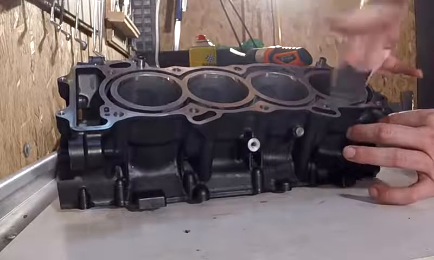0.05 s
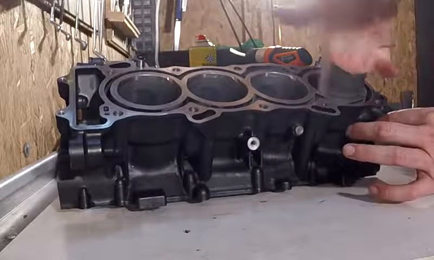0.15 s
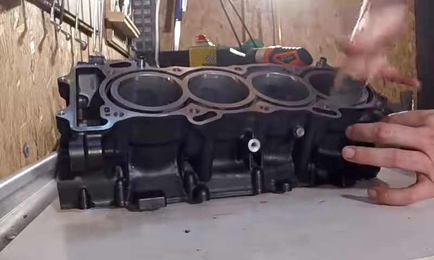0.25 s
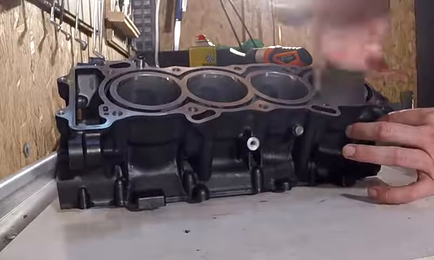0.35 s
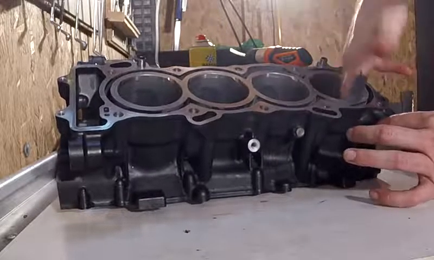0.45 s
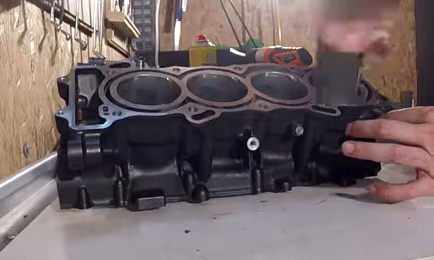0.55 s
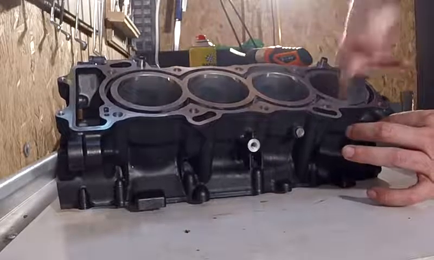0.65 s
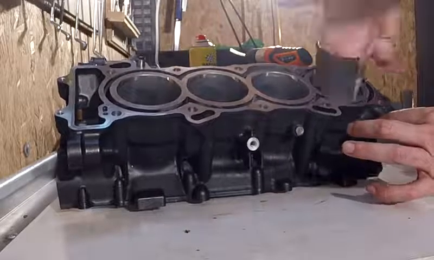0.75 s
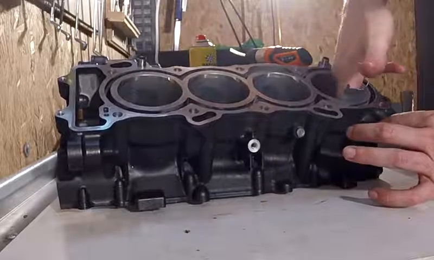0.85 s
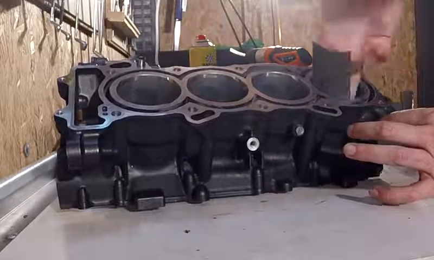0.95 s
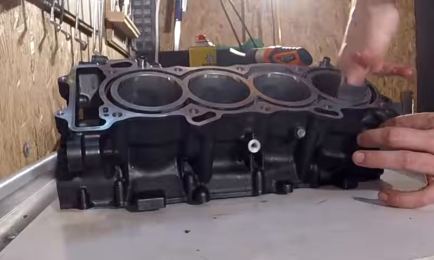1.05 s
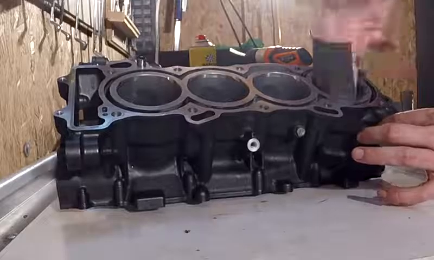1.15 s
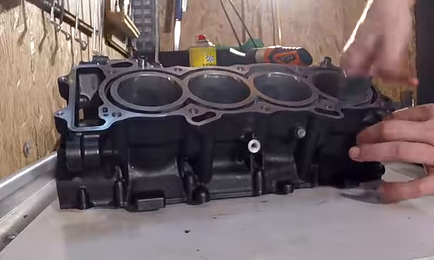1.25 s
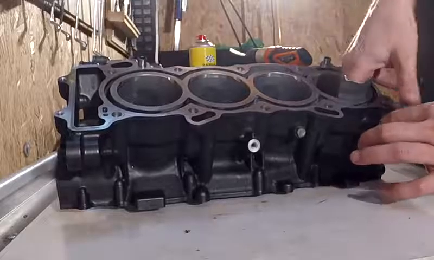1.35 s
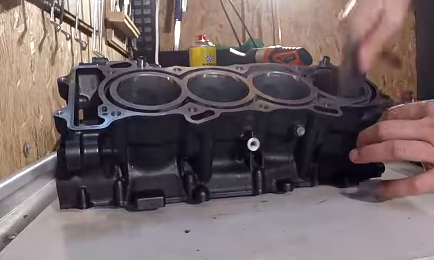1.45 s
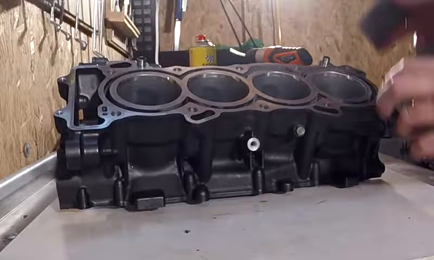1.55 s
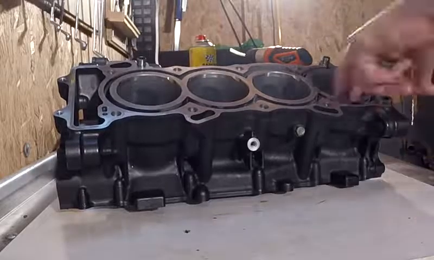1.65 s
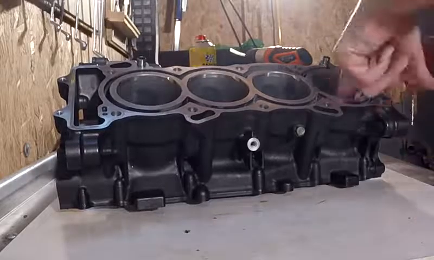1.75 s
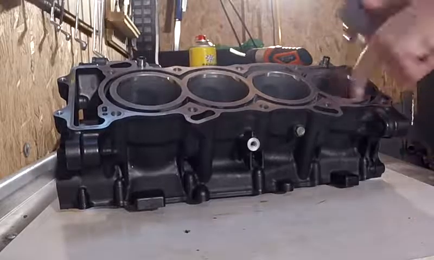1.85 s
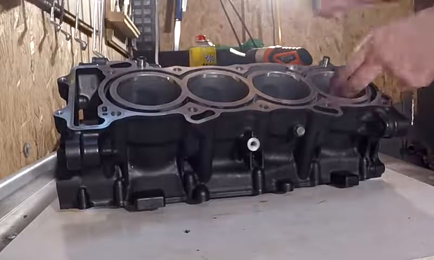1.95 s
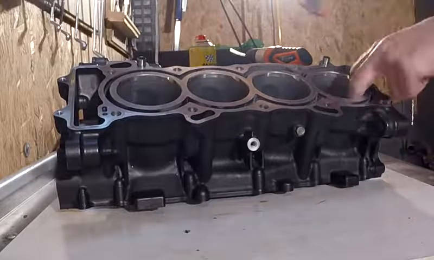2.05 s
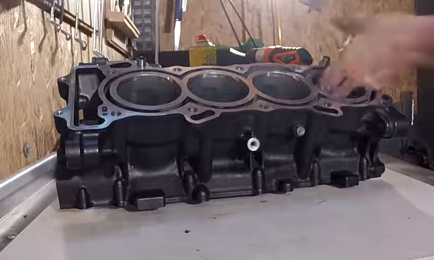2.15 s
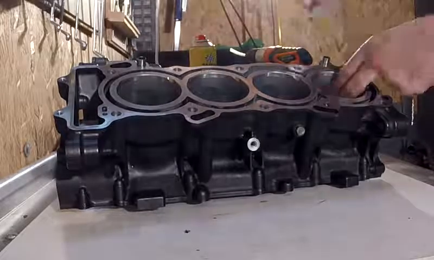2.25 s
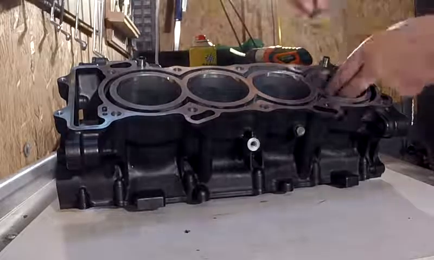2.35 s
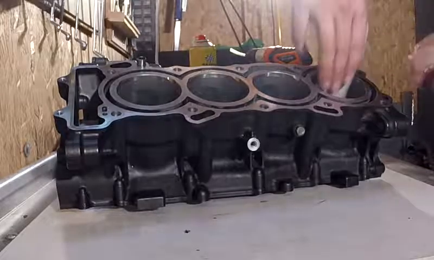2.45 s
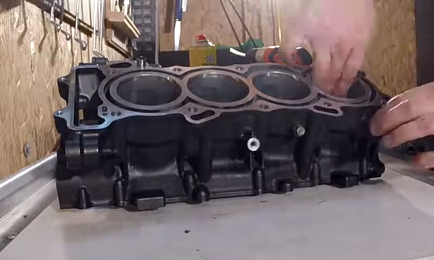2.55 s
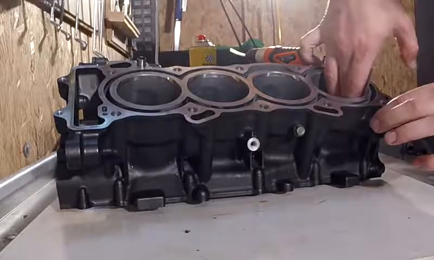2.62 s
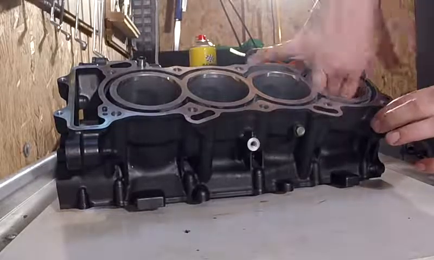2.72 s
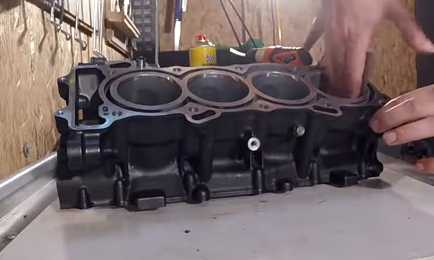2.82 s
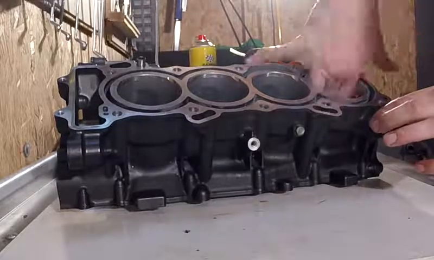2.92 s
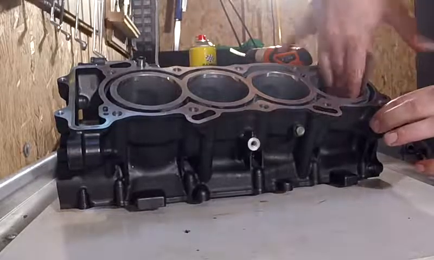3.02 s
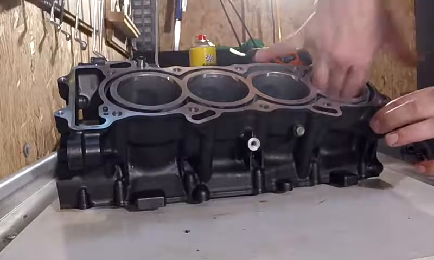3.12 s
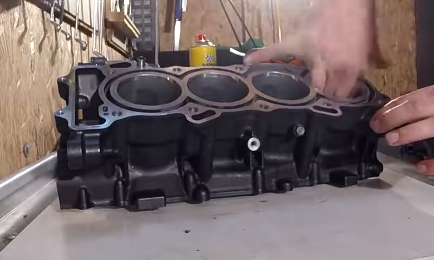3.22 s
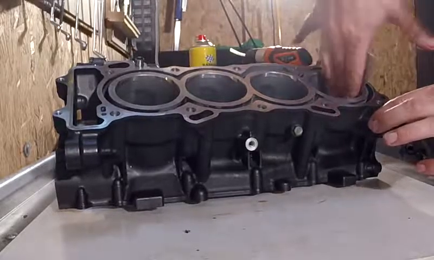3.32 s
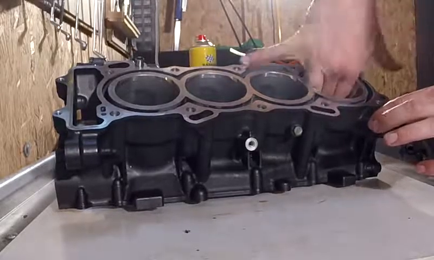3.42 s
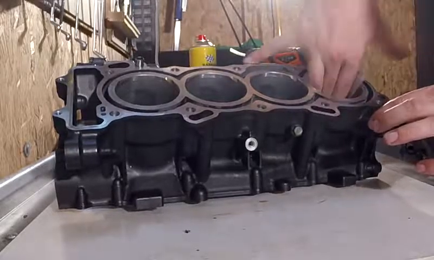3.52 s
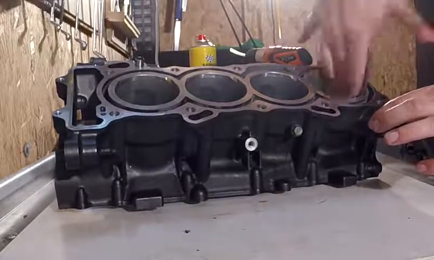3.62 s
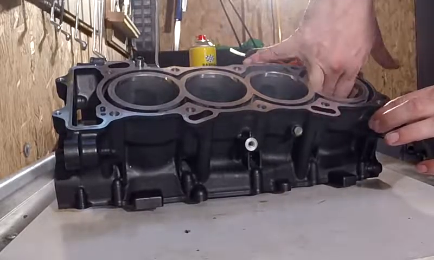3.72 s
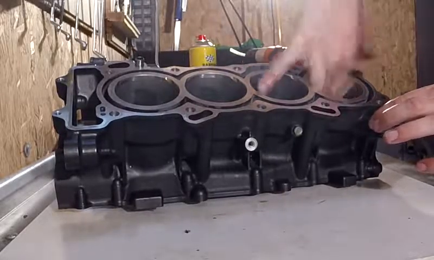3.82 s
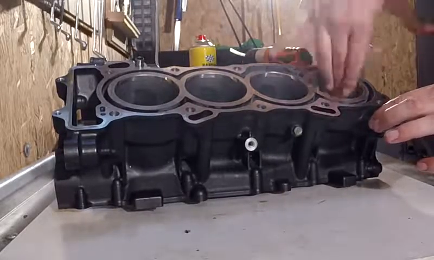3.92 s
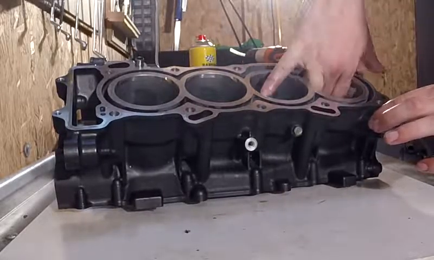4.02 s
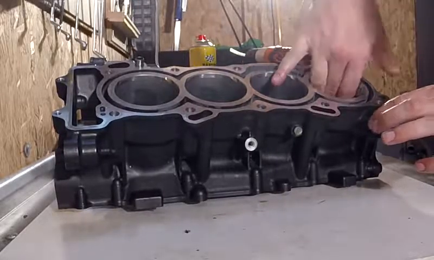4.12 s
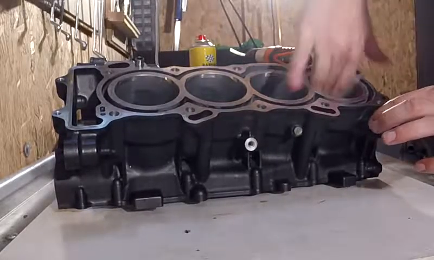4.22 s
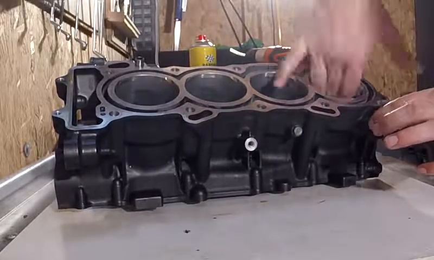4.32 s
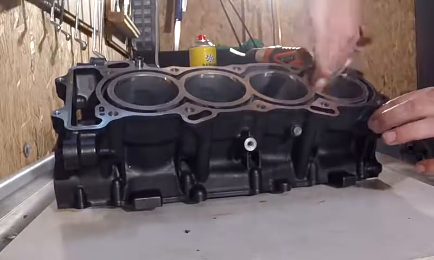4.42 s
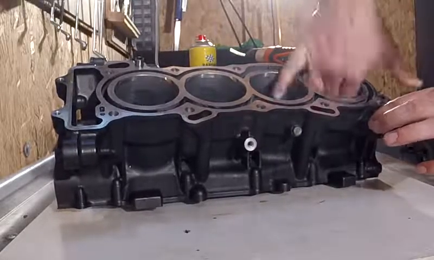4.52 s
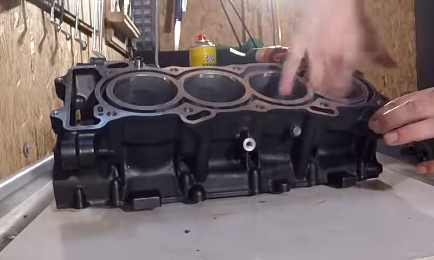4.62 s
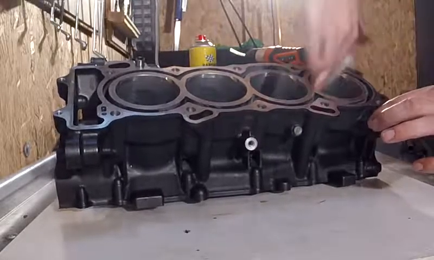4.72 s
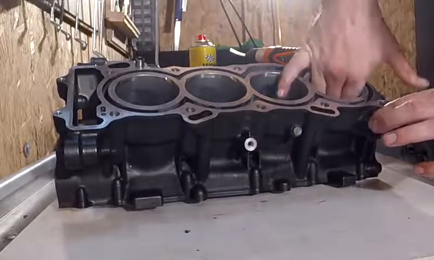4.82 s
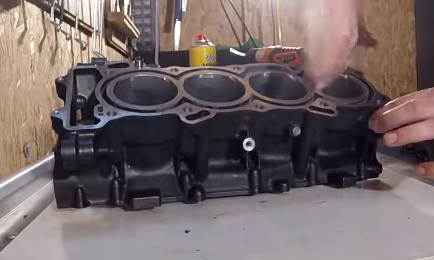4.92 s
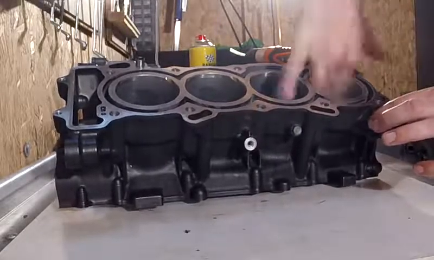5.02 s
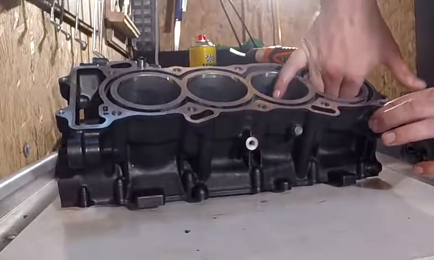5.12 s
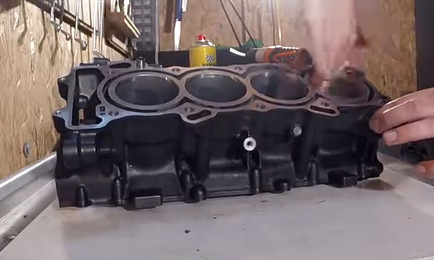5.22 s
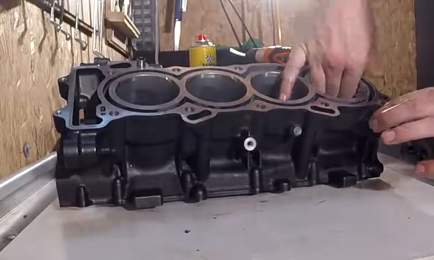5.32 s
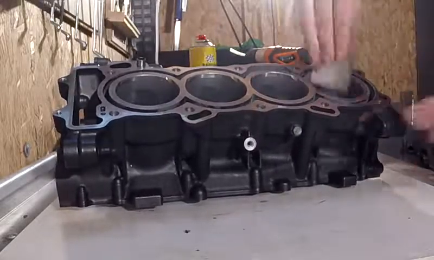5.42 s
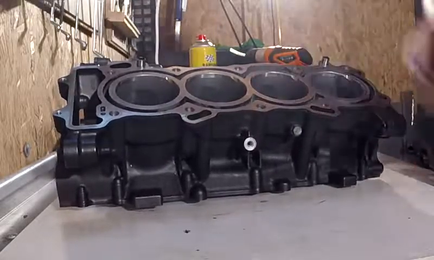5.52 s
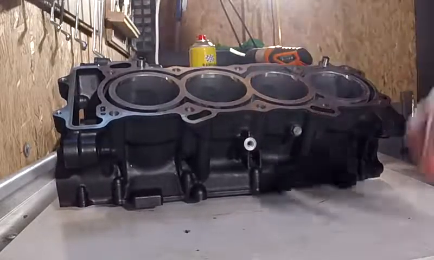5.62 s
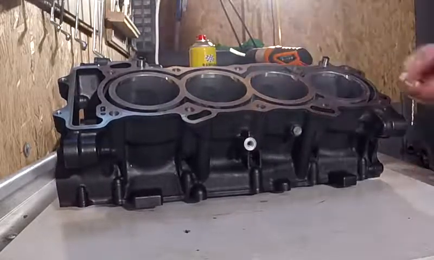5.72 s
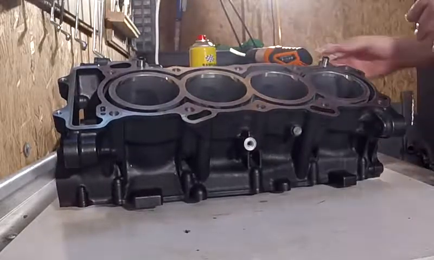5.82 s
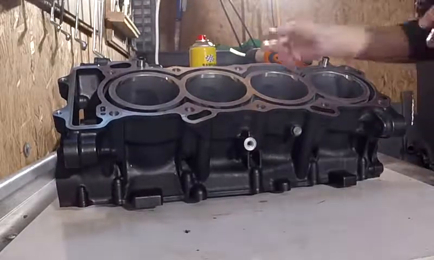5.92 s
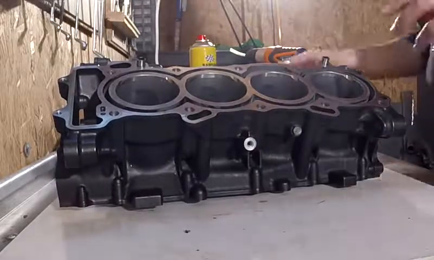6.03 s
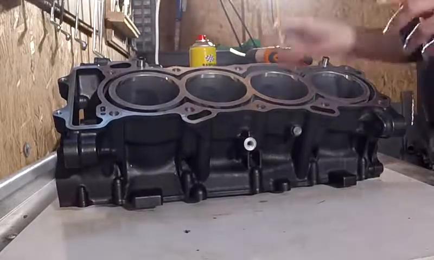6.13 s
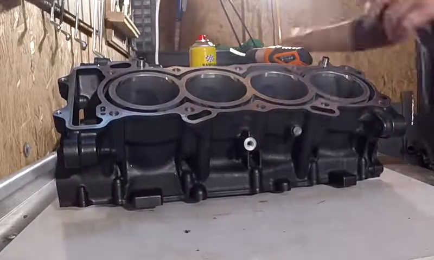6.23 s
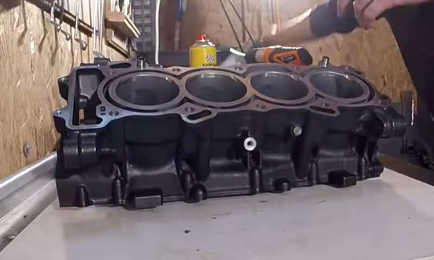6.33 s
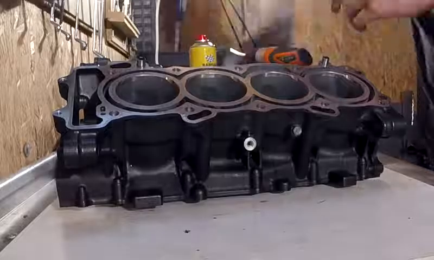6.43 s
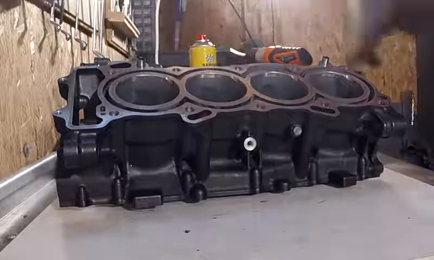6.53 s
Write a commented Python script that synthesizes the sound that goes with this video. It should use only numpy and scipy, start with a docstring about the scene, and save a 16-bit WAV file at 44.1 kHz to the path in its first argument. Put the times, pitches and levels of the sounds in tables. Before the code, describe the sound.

Abrasive paper hisses in fast short strokes against metal, with dull clunks of a heavy casting, a break, coarse rasps and renewed rubbing.

```python
"""Abrasive paper is worked by hand up and down the bore of an engine block on a bench, while the workshop rumbles faintly.
First come quick strokes: pushes break loose at once and hiss briefly, and between them the paper drags back softly.
From early on the block rocks and knocks on the bench; after a pause come rasps, a snap of the paper and more strokes.
A last snap ends the rubbing and a faint knock follows. Tiny random clicks of grit are coloured by sheet, bore and metal;
knocks are short contacts that ring the block; shaking, creeping paper and workshop are filtered noise."""
import sys
import numpy as np
from scipy import signal
from scipy.fft import rfft, irfft
from scipy.io import wavfile
from scipy.ndimage import uniform_filter1d

SR = 44100
rng = np.random.default_rng(int(sys.argv[2]) if len(sys.argv) > 2 else 0)


def inscribe(sig):
    """Save sig as 16-bit PCM at rate SR to the path in sys.argv[1].

    A 1-D sig is mono; a 2-D sig holds one channel per row.
    Samples are clipped to [-1, 1] before scaling.
    """
    pcm = np.round(np.clip(np.atleast_2d(sig).T, -1, 1) * 32767)
    wavfile.write(sys.argv[1], SR, pcm.astype(np.int16))


N = 289737

ROCK_HZ = 65.3  # how fast the block rocks on the bench

# Fixed resonances of the metal casting: (centre [Hz], width [Hz], boost [dB])
CASTING_RESONANCES = [(663, 45, 7), (880, 50, 3), (1017, 55, 5), (1335, 120, 4), (1800, 250, -3),
                      (2316, 70, 4), (2590, 90, 3), (2906, 80, 4), (3345, 90, 3), (4020, 220, 2),
                      (4957, 90, 3), (7690, 100, 3), (8062, 100, 4), (8349, 120, 5)]


def undb(db):
    """Turn decibels into a gain."""
    return 10 ** (np.asarray(db) / 20)


def unit(x):
    """Scale a sound to an rms (average strength) of 1."""
    return x / np.sqrt(np.mean(x ** 2))


def freqs(size):
    """Frequency in Hz of every spectral bin, at least 1 so that its logarithm exists."""
    return np.maximum(np.fft.rfftfreq(size, 1 / SR), 1)


def contour(f, points):
    """Read a curve of (Hz, dB) points on a log-frequency axis."""
    hz, db = np.transpose(points)
    return np.interp(np.log(f), np.log(hz), db)


def bump(f, hz, width_hz):
    """Outline of one resonance, 1 at its centre."""
    return 1 / (1 + (2 * (f - hz) / width_hz) ** 2)


def colour(x, db):
    """Filter with the given gain in each bin; minimum phase makes rings follow their cause."""
    half = len(x) // 2
    cepstrum = irfft(np.log(undb(db)), len(x))
    # fold the second half onto the first, so the filter never rings ahead of time
    cepstrum[1:half] *= 2
    cepstrum[half + 1:] = 0
    response = np.exp(rfft(cepstrum))
    return irfft(rfft(x) * response, len(x))


def walk(size, rate):
    """Smooth chance with a spread near 1, heading for a new random value rate times a second."""
    knots = rng.standard_normal(2048)
    position = np.arange(size) / SR * rate
    return 1.2 * np.interp(position, np.arange(len(knots)), knots)


def add(out, start, x):
    """Mix a sound in at its time in seconds."""
    i = max(int(start * SR), 0)
    out[i:i + len(x)] += x[:max(len(out) - i, 0)]


def workshop(level_db=-53.5, waver_db=2):
    """The workshop: faint noise with a steady hiss and a low rumble that wavers."""
    # Spectrum of the workshop noise, before scaling: (frequency [Hz], relative level [dB])
    shop_spectrum = [(12, -26), (20, -1), (77, -5), (152, -9), (189, -14), (242, -12.5), (278, -13.5),
                     (443, -17), (494, -17.5), (632, -19), (787, -20.5), (1060, -21), (7450, -36.5),
                     (14000, -51.5)]
    noise = rng.standard_normal(N)
    air = undb(level_db) * unit(colour(noise, contour(freqs(N), shop_spectrum)))
    low_pass = signal.butter(2, 150, fs=SR, output="sos")
    rumble = signal.sosfiltfilt(low_pass, air)
    rumble_gain = undb(waver_db * walk(N, 9.1) - 1.5)
    return air + rumble * (rumble_gain - 1)


def room(x, wet_db=-19, t60_s=0.093, size=16384):
    """Close wooden walls add a short, faint tail in which the highest treble is weak."""
    t = np.arange(size) / SR
    wall_db = contour(freqs(size), [(60, 7.5), (500, 9.0), (4000, 15.5), (13000, -5.5)])
    tail = colour(rng.standard_normal(size), wall_db)
    # the tail starts after 2.2 ms and has faded in after 4.4 ms
    tail *= undb(-60 * t / t60_s) * np.clip(t / 0.0022 - 1, 0, 1)
    tail /= np.sqrt(np.sum(tail ** 2))
    return x + undb(wet_db) * signal.fftconvolve(x, tail)[:N]


def shake(rubbing, full_db=-44):
    """Friction tugs at the block, so the bench grumbles while the paper moves."""
    # The working arm shakes the bench: (time [s], level at full stroke [dB])
    arm_levels = [(0, -39), (0.7, -49.5), (1.35, -43), (1.55, -40.5), (2.6, -54), (3.5, -53.5), (4.3, -58),
                  (4.9, -57), (5.5, -63)]
    stroke = uniform_filter1d(np.abs(rubbing), size=1300)  # averaged over 29 ms
    tug = np.minimum(stroke / undb(full_db), 1)
    f = freqs(N)
    db = contour(f, [(20, 1.5), (60, 2.5), (130, -3.5), (250, -10.0), (600, -34), (2000, -47)])
    db += 6 * bump(f, ROCK_HZ, 31)
    grumble = unit(colour(rng.standard_normal(N), db))
    level_db = np.interp(np.arange(N) / SR, *np.transpose(arm_levels))
    return grumble * tug * undb(level_db)


def creep(rubbing, below_db=-24):
    """Around the strokes and at the turns of the hand, creeping paper whispers on the wall."""
    busy = uniform_filter1d(np.abs(rubbing), size=7000)  # averaged over 159 ms to bridge short gaps
    db = contour(freqs(N), [(200, -2), (900, 1), (3200, 7), (6000, 12), (13000, -64)])
    whisper = unit(colour(rng.standard_normal(N), db))
    return whisper * busy * undb(below_db)


def grains(size, per_s, spread):
    """Random clicks as abrasive grains catch and let go; a few are larger than the rest."""
    caught = rng.random(size) < per_s / SR
    strength_db = spread * np.minimum(rng.exponential(size=size), 5)
    return unit(caught * rng.standard_normal(size) * undb(strength_db))


def knock(contact_ms, rock_db, rattle_db=-18, rattle_t60_s=0.24, rattle_per_rock=0.67, settle_s=0.03, size=16384):
    """A foot of the block meets the bench: a short push rings the block and sets its mass rocking."""
    # What block and bench ring with: (frequency [Hz], level before metal_db [dB], time to fall 60 dB [s])
    block_modes = [(124, -13.5, 0.093), (170.6, 1, 0.024), (265, -9, 0.033), (321, -20.5, 0.031),
                   (475, -17.5, 0.039), (572, -20, 0.027), (661, -14.5, 0.058), (763, -11, 0.0093),
                   (1054, -2.5, 0.014), (1297, -6, 0.028), (1520, -54, 0.022), (1900, -26, .05)]
    metal_db = 2  # lifts the ringing above 300 Hz and the rattle out of the thud
    rocking_db, rocking_t60_s = -5, 0.19
    t = np.arange(size) / SR
    held = 1 / (1 + (t / settle_s) ** 6)  # the steadying hand stops the rocking after a few swings
    rocking_gain = undb(rocking_db + rock_db - 60 * t / rocking_t60_s)
    ring = -rocking_gain * np.sin(2 * np.pi * ROCK_HZ * t) * held
    for hz, mode_db, t60_s in block_modes:
        mode_gain = undb(mode_db + metal_db * (hz > 300) - 60 * t / t60_s)
        varied_hz = hz * (1 + 0.012 * rng.standard_normal())
        ring += mode_gain * np.cos(2 * np.pi * varied_hz * t)
    # the harder the block rocks, the more its feet chatter on the bench
    feet_db = contour(freqs(size), [(80, -10), (330, 4.5), (900, 0.5), (2500, -18), (9000, -27)])
    rattle = unit(colour(grains(size, 900, 0.49), feet_db))
    chatter_db = rattle_db + metal_db + rattle_per_rock * rock_db
    ring += rattle * held * undb(chatter_db - 60 * t / rattle_t60_s)
    # the push is half a sine wave: longer contact gives a duller knock
    contact = np.sin(np.pi * np.clip(t[:512] * 1000 / max(contact_ms, .2), 0, 1))
    return signal.fftconvolve(ring, contact / contact.sum())


def knocks(rebound_db=-8, rebound_per_rock=1.0, rebound_s=.0155, softer=1.95):
    """The block knocks, then lands again about one swing later, more softly; less rocking can make that fainter."""
    # Knocks of the block on the bench: (time [s], level [dB], contact time [ms], rocking [dB])
    knock_list = [(0.279, -17.5, 1.3, -30), (0.373, -27.5, 1.3, 2), (0.463, -27, 2.64, -2),
                  (0.6495, -12.5, 1.22, -1), (0.822, -25.5, 1.05, 8), (1.039, -17.5, 1.37, -7),
                  (1.111, -17.5, 0.53, 6), (1.361, -22, 0.87, 10), (1.391, -27, 1, -25),
                  (2.437, -38.5, 5.7, 5), (3.308, -18.5, 1.57, -14), (3.747, -34.5, 3.4, -3),
                  (3.999, -35.5, 1.2, -14), (4.481, -26.5, 0.66, 9.5), (4.52, -27, 2.8, -0.5),
                  (4.814, -34.5, 1.44, 4), (4.982, -31, 1.15, 3), (6.505, -42, 0.8, -15)]
    out = np.zeros(N)
    for start, db, contact_ms, rock_db in knock_list:
        add(out, start, undb(db) * knock(contact_ms, rock_db))
        landing = knock(softer * contact_ms, rock_db=-27)
        swing_s = rebound_s * (1 + 0.062 * rng.standard_normal())
        landing_db = db + rebound_db + rebound_per_rock * min(rock_db, 0)
        add(out, start + swing_s, undb(landing_db) * landing)
    return out


def casting_boost(f):
    """Resonances of the metal casting strengthen or weaken some frequencies, in dB."""
    return sum(boost * bump(f, hz, width) for hz, width, boost in CASTING_RESONANCES)


def ripple(f):
    """Random uneven colouring of the hiss, in dB for every frequency, weaker below 4500 Hz."""
    uneven = np.interp(f, np.linspace(0, SR / 2, 110), rng.standard_normal(110))
    return 4.2 * uneven * np.minimum(f / 4500, 1)


def cover(s):
    """The hand closes the bore more or less tightly, which sets its resonance in dB at this moment."""
    # How tightly the hand closes the bore: (time [s], strength of the resonance [dB])
    hand_cover = [(0, 13.5), (.6, 10), (1.2, 7), (1.35, -0.5), (2.65, 7), (2.85, 12.5), (3.2, 8),
                  (3.45, -2), (3.6, 12), (4.05, 3), (4.5, 7), (5.35, 6.5), (5.55, 5)]
    return np.interp(s, *np.transpose(hand_cover))


def slide(treble_db, bore_hz, bore_db, sheet_db, chatter_db, bore_width_hz=380, size=8192):
    """Sliding grit, uneven with the grip, heard through paper sheet, covered bore and casting."""
    # Spectrum of grit on metal, before the other colourings: (frequency [Hz], relative level [dB])
    grit_spectrum = [(40, -8), (120, 0), (300, -9), (600, -5.5), (1200, -5), (1900, -2), (3000, -1),
                     (4800, 0.5), (6500, -0.5), (9000, -4), (13000, -6), (15000, -19.5)]
    f = freqs(size)
    db = contour(f, grit_spectrum) + casting_boost(f)
    db += treble_db * np.interp(f, [2600, 8500], [0, 1])
    # the hollow under the hand rings, with a dip on either side
    hollow = bump(f, bore_hz, bore_width_hz)
    hollow -= 0.26 * bump(f, 0.61 * bore_hz, 390)
    hollow -= 0.36 * bump(f, 1.34 * bore_hz, 340)
    db += bore_db * hollow
    db += sheet_db * bump(f, 4870, 2900)
    grit = grains(size, 40000, 0.16) * undb(chatter_db * walk(size, 287.0))
    # the hiss fades back and forth between two random colourings, so its fine tone keeps changing
    fade = 2 * np.pi * 4 * np.arange(size) / SR
    first = unit(colour(grit, db + ripple(f)))
    second = unit(colour(grit, db + ripple(f)))
    return unit(first * np.cos(fade) ** 2 + second * np.sin(fade) ** 2)


def flick(t60_s=0.051, rise_s=0.0017):
    """The stiff sheet's edge snaps dryly: a burst of grit sound that dies away fast."""
    # Snaps as the paper is set in and as it is lifted away: (time [s], level [dB])
    flick_list = [(2.594, -35), (5.716, -39)]
    out = np.zeros(N)
    for start, db in flick_list:
        snap = slide(treble_db=-6.5, bore_hz=2600, bore_db=6, sheet_db=8.5, chatter_db=-1.0)
        t = np.arange(len(snap)) / SR
        add(out, start, snap * np.minimum(t / rise_s, 1) * undb(db - 60 * t / t60_s))
    return out


def rasps(width_hz=750, body_db=18, depth_db=15, level_db=1, size=8192):
    """Fingers and paper judder on the wall: coarse stick-slip builds and dies away, ringing the bore."""
    # Rasps: (start [s], build-up [s], dying away [s], level before level_db [dB], centre [Hz])
    rasp_list = [(2.065, 0.026, .025, -52.5, 1980), (2.075, .038, 0.029, -49, 840),
                 (4.291, 0.013, 0.035, -43, 1150), (4.592, 0.043, 0.0053, -39.5, 1400),
                 (4.68, 0.0076, 0.018, -43, 980), (4.763, 0.0066, 0.11, -41.5, 1390),
                 (4.934, 0.017, 0.017, -40, 1000), (5.131, 0.014, 0.011, -42.5, 1350),
                 (5.231, 0.0086, .03, -34.5, 900), (5.239, 0.015, 0.074, -39.5, 1570)]
    out, f = np.zeros(N), freqs(size)
    t = np.arange(size) / SR
    skirt_db = contour(f, [(100, 2), (450, -12.5), (700, 3.5), (1150, 0.0), (1800, 9),
                           (4200, 9.5), (6500, 0), (14000, -8)])
    for start, build_s, die_s, db, hz in rasp_list:
        body = body_db * bump(f, hz, width_hz)
        judder = unit(colour(grains(size, 3500, 0.67), skirt_db + casting_boost(f) + body))
        grip = np.interp(t, [0, build_s, build_s + die_s], [0, 1, 0])
        gain = undb(db + level_db + depth_db * (grip - 1))
        add(out, start, judder * np.minimum(6 * grip, 1) * gain)
    return out


def drags(swell_s=.024, fade_s=0.0079, level_db=0.26, slack_db_per_s=-95, slackest_db=-5.5, dull_db=-4,
          grip_db=2.16, size=16384):
    """The return stroke swells in gently, grows louder and brighter as the grip tightens, then eases off."""
    # Drags: (start [s], length [s], level before grip and level_db [dB], treble of the firm grip [dB],
    # resonance of the covered bore [Hz])
    drag_list = [(0.004, .03, -45, -2, 2150), (.2, .04, -47, -3, 2050), (.243, .05, -41, 1, 2200),
                 (.29, .043, -45, -2, 2620), (.588, .045, -46, -7, 2050), (.635, .045, -40.5, -1.5, 2460),
                 (.678, .038, -55, -18, 2880), (1.142, .094, -41, 0, 2400), (1.29, .024, -44, -11, 2900),
                 (1.333, .062, -38, -2.5, 2630), (1.545, .052, -51, 2, 3130), (2.605, .158, -46, 1.5, 3300),
                 (2.808, .044, -43, -1, 2200), (2.93, .034, -46, -9, 3370), (3.055, .058, -40, 1, 3050),
                 (3.11, .036, -45, -1, 3230), (3.19, .04, -50, -3, 3250), (3.275, .03, -53, -8, 3200),
                 (3.568, .096, -39, 3.5, 3350), (3.868, .09, -38.5, 6, 3350), (4.072, .057, -41, 1, 2850),
                 (4.215, .1, -45.5, -3, 3300), (4.32, .065, -39, 5, 2950), (4.565, .079, -39, 1.5, 3870),
                 (4.722, .082, -44, 0, 2850), (4.85, .035, -50, -5, 3060), (4.94, .03, -47, -8, 3240),
                 (5.14, .19, -38.5, 1, 3400), (5.493, .085, -47, -3, 3640)]
    sheet_db = 3.5  # how much the sheet rings
    grip_peak = 0.74  # share of a drag after which the grip is hardest
    out = np.zeros(N)
    for start, length, db, treble_db, bore_hz in drag_list:
        bore_db = cover(start)
        firm = slide(treble_db, bore_hz, bore_db, sheet_db, chatter_db=-1.2, size=size)
        loose = slide(treble_db + dull_db, bore_hz, bore_db, sheet_db, chatter_db=1.1, size=size)
        begin = max(start - swell_s / 2, 0)
        t = begin - start + np.arange(size) / SR
        slack_db = np.maximum(slack_db_per_s * np.abs(t - grip_peak * length), slackest_db)
        slack = np.clip(slack_db / slackest_db, 0, 1)  # 0 is a firm grip, 1 a loose one
        hiss = firm * np.sqrt(1 - slack) + loose * np.sqrt(slack)
        speed = np.clip(t / swell_s + .5, 0, 1) * np.clip((length - t) / fade_s + .5, 0, 1)
        gain = undb(db + level_db + slack_db + grip_db * walk(size, 70.7))
        add(out, begin, hiss * np.sin(np.pi / 2 * speed) * gain)
    return out


def pushes(rise_s=0.0017, stop_s=0.017, sag_db=0.16, bite_db=-9, bite_s=0.23, level_db=0.28):
    """The paper breaks loose abruptly with a bright bite, sags slightly in level, and stops at the turn of the hand."""
    # Pushes, all equally long: (start [s], level before sag and level_db [dB], treble [dB],
    # resonance of the covered bore [Hz])
    push_list = [(0.073, -43, -2.5, 2580), (0.161, -41.5, -4.5, 2550), (0.369, -38.5, -7.5, 2050),
                 (0.46, -39.5, 5.5, 2540), (0.545, -37.5, -1, 2680), (0.754, -42, -2.5, 2680),
                 (0.844, -35.5, 0, 2800), (0.93, -41.5, 2, 2490), (1.019, -40, 5, 2450),
                 (1.1, -38, -1.5, 2640), (2.893, -41.5, 3, 2320), (2.977, -45.5, 1.5, 3330),
                 (3.148, -43.5, 0.5, 3340), (3.235, -41, 3.5, 3640), (3.318, -41, 4.5, 3360),
                 (3.403, -45, 3.5, 2450), (3.488, -38.5, 2, 3320), (3.702, -42, 5.5, 3850),
                 (3.787, -40.5, 4, 4240), (4.001, -42, 7.5, 3850), (4.426, -42, 1, 2230),
                 (4.511, -41.5, 2, 3480), (4.683, -44, 2, 2830), (4.812, -39.5, 1, 3960),
                 (4.896, -40, 3.5, 2890), (4.981, -41, 2.5, 3220), (5.068, -41, -1, 2200),
                 (5.366, -41, 3, 2900), (5.453, -46.5, 1, 3070)]
    push_s = 0.043  # the fade-out runs from just before this time to 13 ms after it
    usual_db, usual_sheet_db = -41.5, 4.5  # level of a usual push and how much the sheet rings in it
    sheet_per_db = .6  # a harder push than usual makes the sheet ring more
    out = np.zeros(N)
    for start, db, treble_db, bore_hz in push_list:
        sheet_db = usual_sheet_db + sheet_per_db * (db - usual_db)
        hiss = slide(treble_db, bore_hz, cover(start), sheet_db, chatter_db=0.6)
        t = np.arange(len(hiss)) / SR
        # the difference between neighbouring samples is the bright part of the hiss
        bite = undb(bite_db) * np.exp(-t / bite_s) * np.diff(hiss, prepend=0)
        speed = np.clip(t / rise_s, 0, 1) * np.clip((push_s - t) / stop_s + 0.78, 0, 1) ** 2
        gain = undb(db + level_db + sag_db * (1.5 - t / push_s))
        add(out, start, (hiss + bite) * speed * gain)
    return out


def scene():
    """Sanding and knocks sound in the room, with the workshop noise added."""
    rubbing = pushes() + drags() + rasps()
    near = rubbing + creep(rubbing) + shake(rubbing) + knocks() + flick()
    return (room(near) + workshop())[None]


def record(dry):
    """The recorder cuts the top steeply above 13800 Hz."""
    steep_cut = signal.ellip(8, .2, 70, 13800, fs=SR, output="sos")
    return signal.sosfilt(steep_cut, dry)


dry = scene()
out = record(dry)
inscribe(out)
```